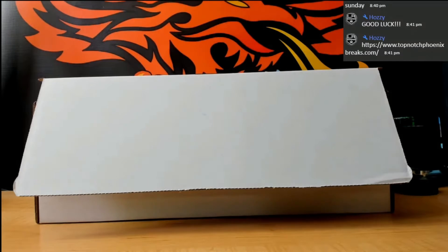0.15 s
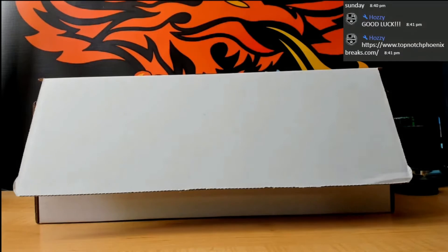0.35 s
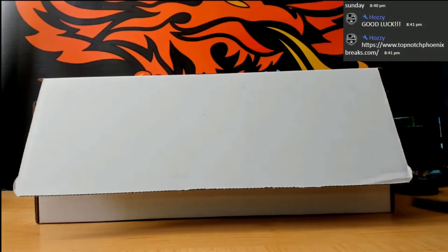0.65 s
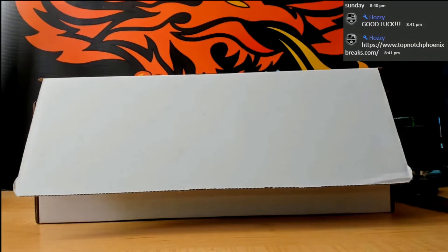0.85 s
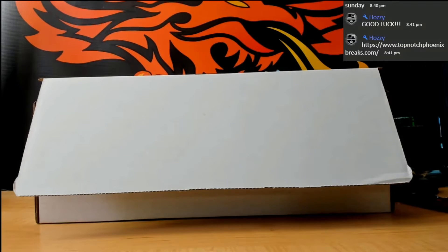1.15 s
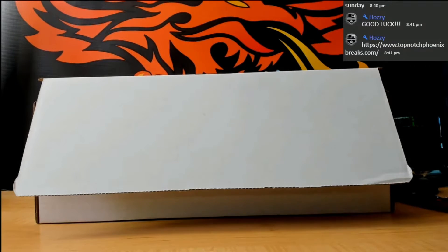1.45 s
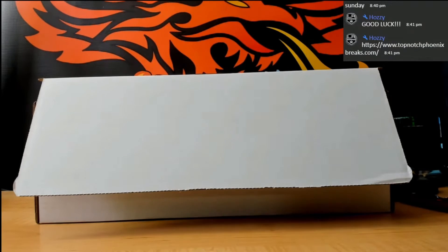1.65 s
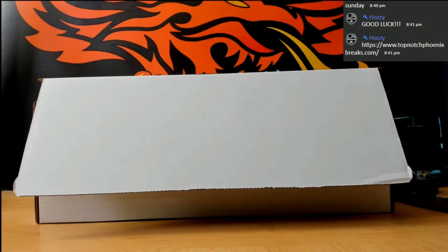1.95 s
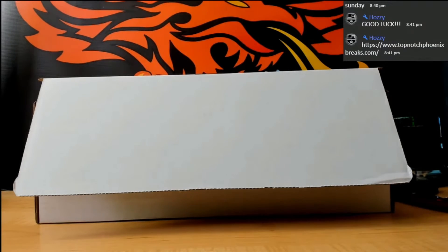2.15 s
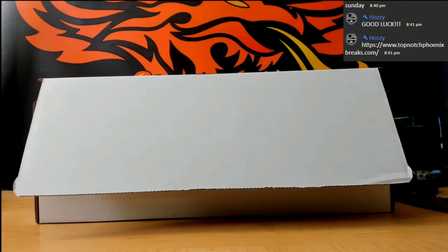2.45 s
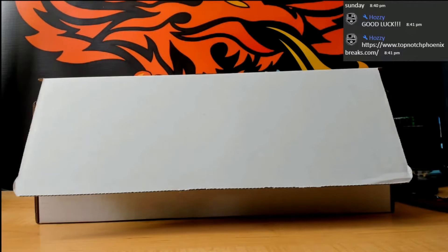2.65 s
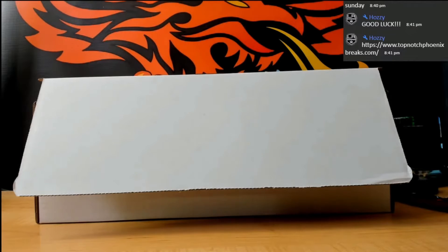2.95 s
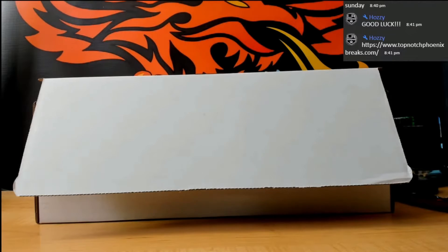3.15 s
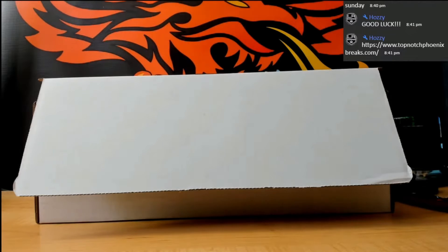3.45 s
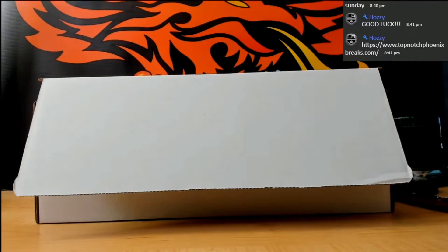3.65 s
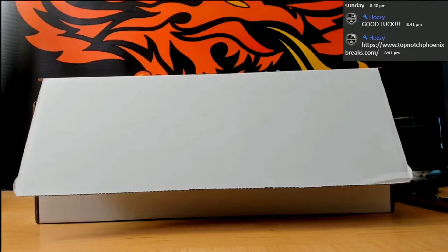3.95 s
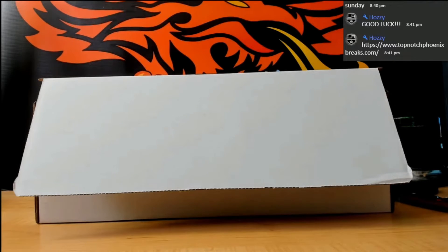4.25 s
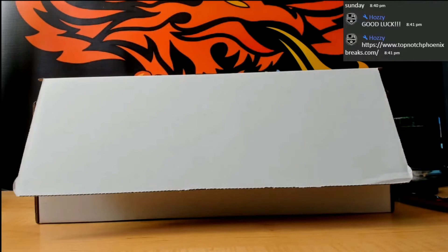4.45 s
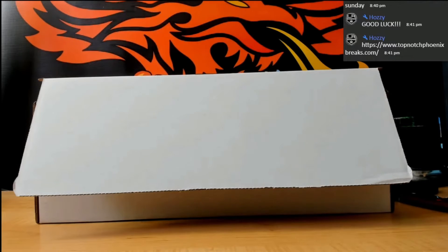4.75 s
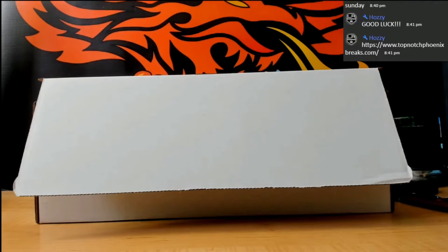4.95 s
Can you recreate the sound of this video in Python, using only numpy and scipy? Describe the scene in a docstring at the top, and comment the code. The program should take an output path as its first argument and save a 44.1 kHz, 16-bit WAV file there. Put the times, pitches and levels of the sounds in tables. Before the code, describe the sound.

Close to the microphone in a small quiet room, something slides and knocks dully on a wooden table. After a pause, a tight plastic cap creaks loose in two quick ratchety pulls with a tiny squeak. A piece drops and bounces on the wood, then light plastic parts click and clatter in two uneven clusters. Faint room air and hum lie underneath.

```python
"""Small parts handled on a wooden table

Things slide and knock down on a wooden table in a quiet room: friction noise, soft bumps and struck modes.
A tight plastic cap comes off in two stick-slip pulls, and its air cavity squeaks with a rough tone.
A piece drops and bounces, and light plastic parts click: short noise bursts coloured by resonances,
some of them early echoes of the stronger ones. Filtered noise makes the room air, wavering sines
a faint mains hum, and a decaying tail the room.
"""
import sys
import numpy as np
from scipy import signal
from scipy.fft import rfft, irfft, next_fast_len
from scipy.io import wavfile

SR = 44100
rng = np.random.default_rng(int(sys.argv[2]) if len(sys.argv) > 2 else 0)


def dump_mix(stems):
    """Bounce the given channels to the path in sys.argv[1] as a 16-bit WAV at rate SR."""
    frames = np.atleast_2d(stems).T  # one column per channel
    limited = np.clip(frames, -1, 1)  # hard clip at full scale
    pcm = np.round(limited * 32767).astype(np.int16)
    wavfile.write(sys.argv[1], SR, pcm)


N = 225026
RING_SIZE = 32768   # samples in a burst or room response
TIME = np.arange(N) / SR
AGE = np.arange(RING_SIZE) / SR   # seconds since a sound began


def from_db(db):
    """Level law: decibels become an amplitude ratio."""
    return 10 ** (np.asarray(db) / 20)


def unit_energy(x):
    """Energy normalization: the squares add up to one."""
    return x / np.sqrt(np.sum(x ** 2) + 1e-20)


def at_hz(points, hz):
    """Logarithmic frequency scale: a curve is interpolated over log frequency."""
    f, value = np.transpose(points)
    return np.interp(np.log(np.maximum(hz, 1)), np.log(f), value)


def in_time(rows):
    """Linear interpolation: each column of a curve is read at every sample."""
    s, *columns = np.transpose(rows)
    return [np.interp(TIME, s, column) for column in columns]


def add(out, s, sound):
    """Superposition: a sound is summed into the mix from time s."""
    start = int(np.clip(round(s * SR), 0, N - 1))
    out[start:start + len(sound)] += sound[:N - start]


def noise(spectrum):
    """Spectral shaping: white noise is weighted in frequency and scaled to rms 1."""
    size = next_fast_len(N)
    gain = from_db(at_hz(spectrum, np.fft.rfftfreq(size, 1 / SR)))
    coloured = irfft(rfft(rng.standard_normal(size)) * gain, size)[:N]
    return unit_energy(coloured) * np.sqrt(N)


def pulse(spectrum, size=2048):
    """Minimum phase: folding the cepstrum gives the most abrupt causal pulse with this spectrum."""
    level_db = at_hz(spectrum, np.fft.rfftfreq(size, 1 / SR))
    cepstrum = irfft(np.log(from_db(level_db)))
    cepstrum[1:size // 2] *= 2
    cepstrum[size // 2 + 1:] = 0
    return irfft(np.exp(rfft(cepstrum)))


def burst(decay_s):
    """High modal density: crowded vibrations that die together act as decaying noise of unit energy."""
    return unit_energy(rng.standard_normal(RING_SIZE) * np.exp(-AGE / decay_s))


def resonate(x, modes):
    """Modal resonance: each mode raises or lowers a narrow band by its dB and rings on."""
    out = x
    for hz, width, db in modes:
        r = np.exp(-np.pi * width / SR)   # pole radius
        numerator = np.array([1, 0, -1]) * (1 - r * r) / 2
        denominator = [1, -2 * r * np.cos(2 * np.pi * hz / SR), r * r]
        band = signal.lfilter(numerator, denominator, x + 1e-18)
        out = out + (from_db(db) - 1) * band
    return out


def contacts(rows, modes, room, bass_hz, gain_db, snap_db, snap_per_edge, snap_s, shell_s, room_db,
             sub_db, dip_db, top_db):
    """Impact excitation: a snap, shell shudder and room are coloured by force and modes; bright ones snap more."""
    # Frequencies in Hz where level, edge and sizzle sit.
    mid_hz, edge_hz, sizzle_hz = (990, 3500, 11000)
    out = np.zeros(N)
    own_shell = burst(shell_s)
    for s, level_db, bass, edge, sizzle in rows:
        # about half of the shell's shudder is shared by all rows, and the rest is new each time
        shell = own_shell + 0.92 * burst(shell_s)
        shell = unit_energy(shell * (1 - np.exp(-AGE / 0.0007)))
        snap = from_db(snap_db + snap_per_edge * edge) * burst(snap_s)
        body = unit_energy(snap + shell) + from_db(room_db) * room
        force = pulse([
            (50, bass + sub_db), (0.82 * bass_hz, bass - 2), (bass_hz, bass),
            (np.sqrt(bass_hz * mid_hz), bass / 2 + dip_db), (mid_hz, 0),
            (2 * mid_hz, 0.35 * edge), (edge_hz, edge), (sizzle_hz, sizzle), (16000, sizzle + top_db)])
        add(out, s, from_db(level_db + gain_db) * signal.fftconvolve(body, force))
    return resonate(out, modes)


def room_tail(build_s, late_db, late_t60):
    """Reverberation: diffuse noise builds up and decays band by band, over a faint dull lingering ring."""
    # Early decay of the room. Each row: frequency in Hz, time to fall by 60 dB in seconds.
    room_t60 = [(120, 0.61), (320, 0.35), (900, 0.27), (2200, 0.24), (6000, 0.24), (14000, 0.13)]
    white = rfft(rng.standard_normal(RING_SIZE))
    hz = np.fft.rfftfreq(RING_SIZE, 1 / SR)
    edges = np.geomspace(40, SR / 2, 15)
    tail = 0
    for low, high in zip(edges, edges[1:]):
        band = irfft(white * ((hz >= low) & (hz < high)))
        centre = np.sqrt(low * high)
        early = from_db(-60 * AGE / at_hz(room_t60, centre))
        lingering = from_db(late_db - 60 * AGE / late_t60) / (1 + (centre / 3000) ** 2)
        tail = tail + band * (early + lingering)
    return unit_energy(tail * (1 - np.exp(-(AGE / build_s) ** 2)))


def background(waver_db):
    """Stationary noise and tones: room air with a slow level curve, and a mains hum whose level wavers."""
    # Colour of the room air. Each row: frequency in Hz, relative level in dB per Hz.
    air_colour = [(13, -37), (22, -9.5), (68, -5), (87, -19), (122, 1), (152, -20), (270, -12.5),
                  (730, -21.5), (861, -22), (1270, -26), (1860, -25), (2320, -31.5), (2520, -27.5),
                  (4500, -37.5), (7500, -39.5), (16000, -48.5)]
    # Level of the room air. Each row: time in seconds, rms level in dB.
    air_db = [(0, -72.5), (0.5, -73), (1.1, -70.5), (1.5, -69), (2.0, -72), (4.3, -72)]
    # Tones of the mains hum. Each row: frequency in Hz, rms level in dB before the waver.
    hum_tones = [(60, -82.5), (119.5, -79.5), (240, -83.5), (358, -88)]
    air = from_db(in_time(air_db)[0]) * noise(air_colour)
    hum = 0
    for hz, db in hum_tones:
        waver = noise([(1, 0.5), (3, -4.5), (10, -31), (100, -100)])
        tone = np.sqrt(2) * np.sin(2 * np.pi * (hz * TIME + rng.random()))
        hum = hum + from_db(db + waver_db * waver) * tone
    return air + hum


def sliding(grain_db):
    """Dry friction: each stroke swells and dies, with a dull rub in the board and a grainy surface hiss."""
    # Things sliding over the table and fingers brushing plastic. Each row: peak time in seconds,
    # rise in seconds, fall in seconds, rub level in dB, hiss level in dB (both before the grain).
    strokes = [(0.255, 0.03, 0.042, -60.5, -78), (0.29, 0.025, 0.04, -73, -65),
               (0.362, 0.071, 0.04, -41, -76), (0.386, 0.039, 0.076, -56, -52.5),
               (0.625, 0.011, 0.21, -46, -67.5), (0.73, 0.076, 0.2, -49.5, -67),
               (0.81, 0.013, 0.1, -51.5, -60.5), (0.925, 0.087, 0.12, -51, -73),
               (1.03, 0.033, 0.11, -62, -75.5), (1.62, 0.1, 0.45, -85.5, -79),
               (2.073, 0.016, 0.1, -90, -43), (2.039, 0.086, 0.04, -91.5, -69),
               (2.24, 0.045, 0.14, -78, -47.5), (2.554, 0.042, 0.039, -90, -59.5),
               (3.829, 0.012, 0.077, -52, -84), (3.90, 0.052, 0.14, -59, -59.5),
               (4.08, 0.032, 0.08, -52, -76), (4.19, 0.08, 0.072, -55, -74), (4.539, 0.08, 0.09, -44, -58),
               (4.71, 0.03, 0.1, -74, -86)]
    # Colour of the rub in the board. Each row: frequency in Hz, relative level in dB per Hz.
    rub_colour = [(88, -35.5), (150, -5.5), (263, -6), (415, 0.5), (769, -14), (1030, -3.5), (1110, -16),
                  (1370, -5.5), (1640, -14.5), (2690, -14), (4000, -27.5), (5200, -57.5), (8800, -120)]
    # Colour of the hiss from the surfaces. Each row: frequency in Hz, relative level in dB per Hz.
    hiss_colour = [(1500, -15), (2600, 0.5), (4200, -3.5), (6500, 4), (9000, -4), (15000, -11)]
    drop_db = 21.5   # change of level over one rise or one fall
    rub_power = hiss_power = 0
    for s, rise_s, fall_s, rub_db, hiss_db in strokes:
        distance = np.maximum((s - TIME) / rise_s, (TIME - s) / fall_s)
        speed = from_db(-drop_db * np.minimum(distance, 10))
        rub_power = rub_power + (speed * from_db(rub_db)) ** 2
        hiss_power = hiss_power + (speed * from_db(hiss_db)) ** 2
    grain = from_db(grain_db * noise([(60, 6), (300, -8.0), (2000, -35), (8000, -69.5)]))
    rub = np.sqrt(rub_power) * noise(rub_colour)
    hiss = np.sqrt(hiss_power) * noise(hiss_colour)
    return grain * (rub + hiss)


def bumps(rise_s, t60):
    """Damped oscillation: a soft hand pushes the table top into a few slow swings."""
    # Soft bumps of a hand. Each row: start in seconds, relative level in dB, pitch in Hz.
    hand_bumps = [(0.233, -50.5, 150), (.248, -43, 165), (0.299, -48, 175), (0.359, -42, 170),
                  (.615, -29.5, 180), (0.736, -33, 165), (0.879, -48.5, 127), (1.114, -52.5, 195),
                  (1.535, -58.5, 70), (1.754, -51, 150), (1.785, -57, 210), (2.469, -55, 165),
                  (2.760, -54.5, 130), (3.622, -49, 150), (4.544, -41, 165)]
    out = np.zeros(N)
    for s, db, hz in hand_bumps:
        envelope = from_db(db + 4 - 60 * AGE / t60) * (1 - np.exp(-AGE / rise_s))
        add(out, s, envelope * np.sin(2 * np.pi * hz * AGE))
    return out


def table_knocks(room, sizzle_db, sizzle_per_edge, sizzle_per_level):
    """Damping in wood: the top of a knock is swallowed; a harder edge or higher level lets more through."""
    # Things knocking on the table, and early echoes of the harder knocks. Each row: start in seconds,
    # relative level in dB at about 1 kHz, bass in dB and edge in dB, both relative to that level.
    arrivals = [(0.3605, -4.5, 5.5, -20), (0.6156, 10, 6.5, -18.5), (0.7022, 10.5, -4, -26.5),
                (0.7165, -0.5, 14.5, -14.5), (0.7251, 9, -6, -12), (0.7384, 9.5, -7, -16.5),
                (0.7794, 7, -25, -25.5), (0.8101, -0.5, 2.5, -10.5), (0.8713, -2.5, 1.5, -21.5),
                (0.8906, 0, 0.5, -19.5), (0.932, -2.5, -18, -33), (0.9551, -7, -7, -32),
                (1.114, -30, 17.5, -20), (2.97, 14.5, 0.5, -27), (2.9891, 14, -3, 1),
                (2.9922, 13.5, -14, -12), (3.0, 11.5, -7.5, -19), (3.0945, 0, -15, -12), (3.1849, 4, 3, -5),
                (3.237, -5.5, 10, -25), (3.276, -9, -1, -23), (3.3004, -5.5, 3, -9), (3.314, -12.5, 8, -21)]
    # Resonances of the table. Each row: frequency in Hz, width in Hz, lift in dB (negative lowers).
    table_modes = [(208, 52, 5), (531, 20, 7.5), (808, 12, 3), (942, 53, 8), (1187, 79, 5), (1330, 22, 6),
                   (1526, 13, 6.5), (1824, 27, 6.5), (2050, 65, 6.5), (2280, 250, 6), (2690, 11, 4.5),
                   (3630, 53, -1.5), (7610, 540, 5)]
    rows = []
    for s, db, bass, edge in arrivals:
        sizzle = sizzle_db + sizzle_per_edge * edge + sizzle_per_level * db
        rows.append((s, db, bass, edge, sizzle))
    return contacts(rows, table_modes, room, bass_hz=208, gain_db=-3.5, snap_db=0.0, snap_per_edge=0.35,
                    snap_s=0.00087, shell_s=0.0046, room_db=-8, sub_db=-18.5, dip_db=-4.5, top_db=-6)


def plastic_clicks(room):
    """Light impact and reflection: small plastic parts click with their own modes, and some clicks echo."""
    # Parts touching, and echoes of the stronger clicks from a nearby surface. Each row: start in seconds,
    # relative level in dB at about 1 kHz, bass in dB, edge in dB and sizzle in dB relative to that level.
    arrivals = [(1.8994, -46, 0, 19, 6.5), (2.0605, -37, -1, 6, 11.5), (2.4232, -26, -2, 9.5, -3.5),
                (2.431, -24, 7.5, -12, -18), (2.5535, -24, -0.5, 7, 3.5), (3.8205, -7, -2, -12.5, -28),
                (3.851, -20.5, 0, 9.5, 9), (3.8935, -17, -14, -13, -11), (3.9084, -9, -12, -15, -4.5),
                (3.9782, -25, 15, 2.5, -14), (4.0005, -7.5, -10, -19, -32), (4.1024, -0.5, 0, -0.5, -6.5),
                (4.112, 0, -9.5, -4, -13.5), (4.154, -3, 4.5, -1, -13.5), (4.1673, -13, 10.5, -6.5, -36),
                (4.4135, -22, 13.5, -8.5, -31), (4.4468, -1, -5, -13, -22), (4.4625, -5, 0, 2.5, -17.5),
                (4.4768, 3, 0, -4, -3.5), (4.5048, 6, -5.5, -5.5, -25), (4.5131, 10, -7, -5, -32.5),
                (4.5185, 6, -12, -5, -31), (4.529, 12, -3.5, -45, -19), (4.5455, 3, 4, -3, -15.5),
                (4.555, 6, -4.5, -17, -25), (4.566, -0.5, 7.5, -40, -39), (4.6989, -26, 19.5, -11, -13),
                (4.8672, -3, -6, -7.5, -21), (4.881, -12, 1, -2, -47)]
    # Resonances of the small parts. Each row: frequency in Hz, width in Hz, lift in dB.
    part_modes = [(377, 10, 2.8), (468, 30, 8.3), (545, 36, 6.7), (786, 20, 7.3), (920, 22, 1.6),
                  (1356, 64, 6.9), (1750, 140, 5.5), (2020, 250, 4.3), (2253, 130, 4.3), (3040, 100, 3.3),
                  (4840, 37, 7.1), (8000, 2150, 5.4)]
    return contacts(arrivals, part_modes, room, bass_hz=300, gain_db=-4.5, snap_db=-1.1, snap_per_edge=0.45,
                    snap_s=0.00064, shell_s=0.0052, room_db=-7.0, sub_db=-13.5, dip_db=-1, top_db=-5.5)


def cap_slips(room, bass_db, edge_db, thinning, peak_share, jitter, uneven_db):
    """Stick-slip: a run of slips swells as the grip tightens, then fades as the cap gives; light ones are thin."""
    # Pulls on the tight cap. Each row: start in seconds, length in seconds, mean gap between slips
    # in seconds, slowing exponent, relative level in dB, swell in dB, fade in dB,
    # first sizzle in dB and last sizzle in dB (before the thinning of light slips).
    pulls = [(2.0683, 0.0684, 0.0085, 1.0, -6, 12, 7, 7, -0.5),
             (2.2389, 0.032, 0.0053, 1.35, 3, 5.2, 16, 0.5, -12.5)]
    # Resonances of the cap. Each row: frequency in Hz, width in Hz, lift in dB.
    cap_modes = [(620, 60, 6), (800, 90, 5), (1697, 40, 4), (1997, 35, 6), (2850, 120, 3), (3400, 60, 9),
                 (3880, 130, 6), (5513, 110, 6), (6228, 110, 3), (6980, 160, 4), (8449, 60, 4)]
    rows = []
    for s, length, gap_s, slowing, db, swell_db, fade_db, first_sizzle, last_sizzle in pulls:
        steps = max(round(length / gap_s), 2)
        for k, (early, uneven) in enumerate(rng.standard_normal((32, 2))[:steps + 1]):
            # the first and last slips keep their times; an exponent above 1 spreads the later ones out
            shift = np.clip(jitter * early, -0.5, 0.5) * (0 < k < steps)
            share = ((k + shift) / steps) ** slowing
            grip_db = np.interp(share, [0, peak_share, 1], [-swell_db, 0, -fade_db])
            level_db = db + grip_db + uneven_db * uneven
            edge = edge_db - thinning * grip_db
            sizzle = first_sizzle + (last_sizzle - first_sizzle) * share - thinning * grip_db
            rows.append((s + length * share, level_db, bass_db, edge, sizzle))
    return contacts(rows, cap_modes, room, bass_hz=241, gain_db=-1.5, snap_db=-4.5, snap_per_edge=0.1,
                    snap_s=0.001, shell_s=0.0039, room_db=-11.5, sub_db=-17.5, dip_db=-1.5, top_db=-9.5)


def squeak(rough):
    """Self-sustained oscillation: uneven friction keeps the cap's air cavity ringing as its pitch sags."""
    # Squeaks of the cavity as the cap gives. Each row: start in seconds, length in seconds,
    # starting pitch in Hz and level in dB, both before the roughness.
    squeaks = [(2.079, 0.014, 1000, -40), (2.091, 0.024, 1045, -33), (2.115, 0.016, 914, -32)]
    attack_s, release_s, sag_hz = 0.0071, 0.005, 50
    grip = np.tanh(noise([(100, 0.5), (300, -8.5), (1000, -27.5), (4000, -68.5)]))
    out = 0
    for s, length, start_hz, db in squeaks:
        age = np.clip(TIME - s, 0, length)
        hz = start_hz - sag_hz * (age / length) ** 2
        envelope = np.minimum(age / attack_s, 1) * np.minimum((length - age) / release_s, 1)
        # the grip roughens both pitch and level
        phase = 2 * np.pi * np.cumsum(hz * (1 + 0.25 * rough * grip)) / SR
        tone = np.sqrt(2) * np.sin(phase)
        out = out + envelope * from_db(db) * tone * (1 + rough * grip)
    return out


def scene():
    """Superposition: contacts, friction and bumps share one small room over the background."""
    room = room_tail(build_s=0.0059, late_db=-29.5, late_t60=0.55)
    knocks = table_knocks(room, sizzle_db=-35, sizzle_per_edge=0.63, sizzle_per_level=0.72)
    slips = cap_slips(room, bass_db=-22.5, edge_db=3.0, thinning=0.65, peak_share=0.55,
                      jitter=0.07, uneven_db=3.1)
    clicks = plastic_clicks(room)
    soft = bumps(rise_s=0.0051, t60=0.078) + squeak(rough=0.3) + sliding(grain_db=3.0)
    # the contacts already carry their room sound
    soft_room = from_db(-15.5) * signal.fftconvolve(soft, room)[:N]
    mix = knocks + slips + clicks + soft + soft_room + background(waver_db=0.5)
    return mix[None]


def record(dry):
    """Low-pass filtering: an elliptic filter cuts the top steeply above 16 kHz."""
    # order 10, 0.2 dB ripple, 70 dB rejection
    lowpass = signal.ellip(10, 0.2, 70, 16000, fs=SR, output="sos")
    return signal.sosfilt(lowpass, dry)


dry = scene()
out = record(dry)
dump_mix(out)
```